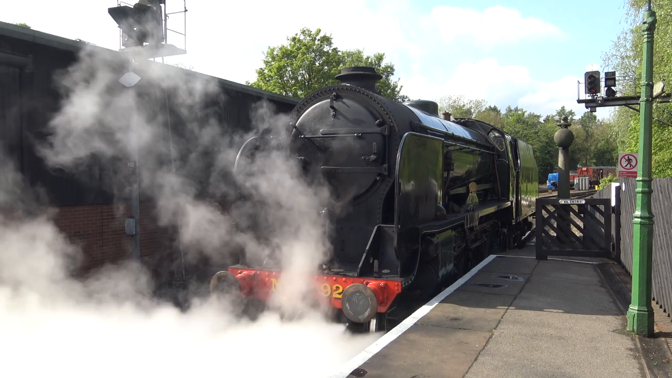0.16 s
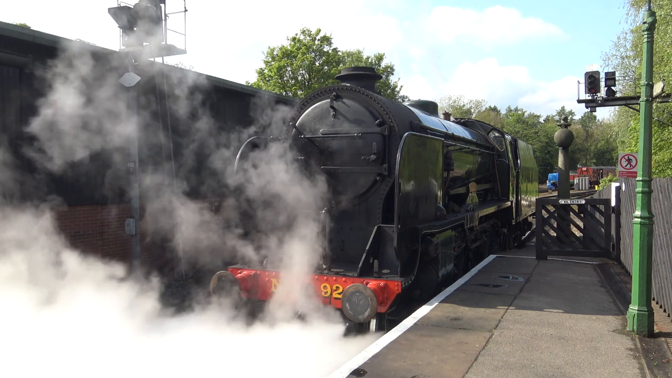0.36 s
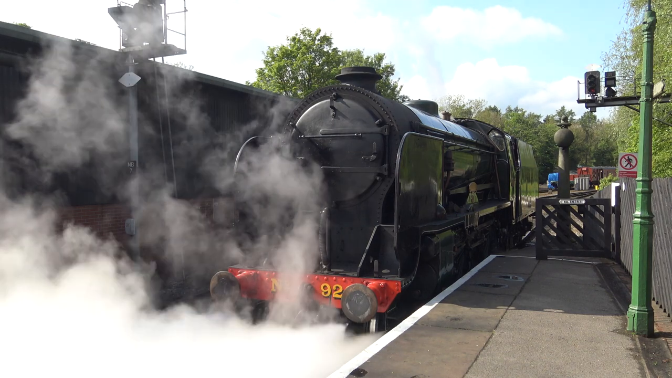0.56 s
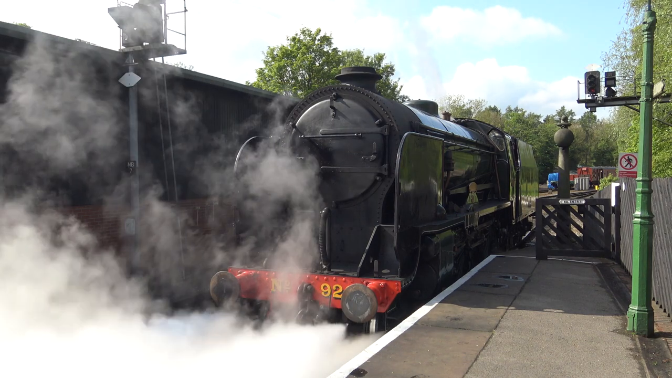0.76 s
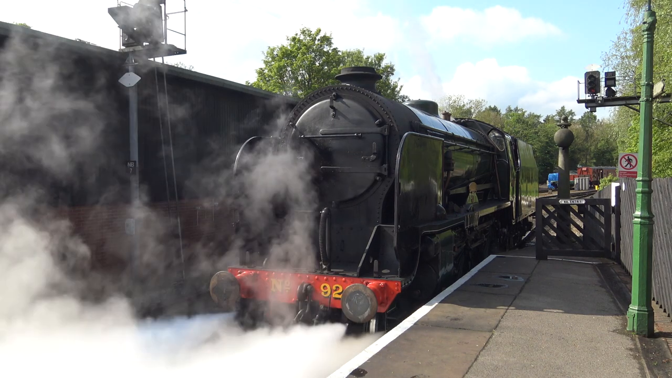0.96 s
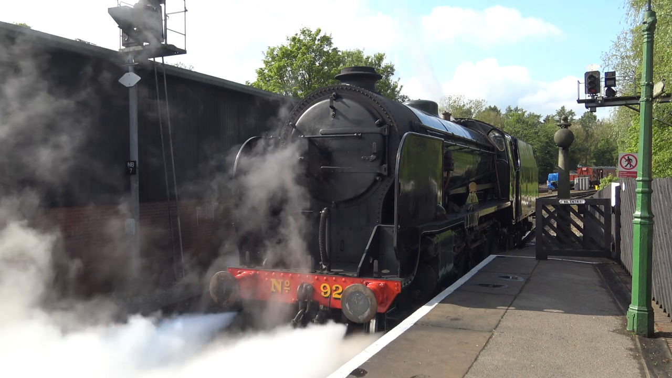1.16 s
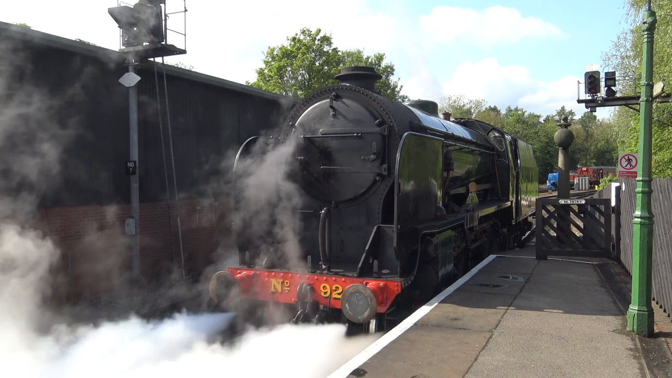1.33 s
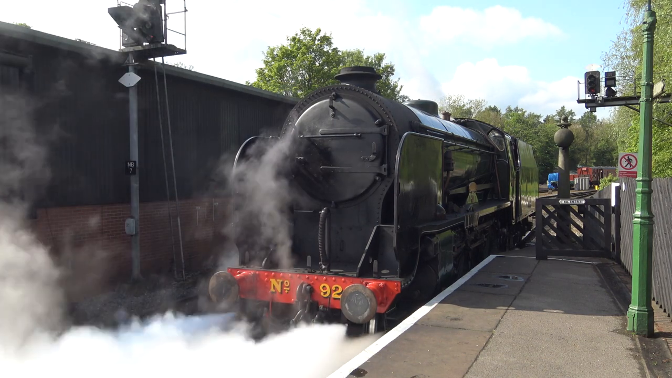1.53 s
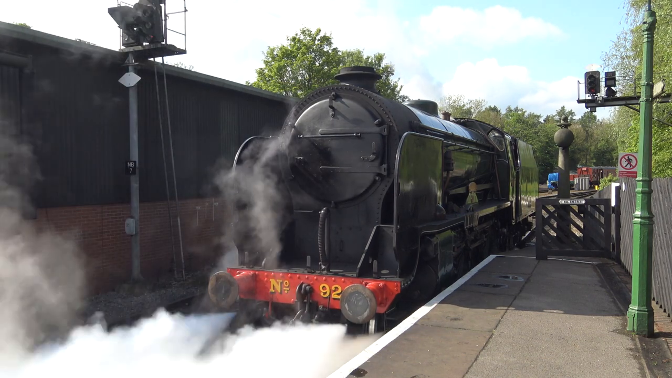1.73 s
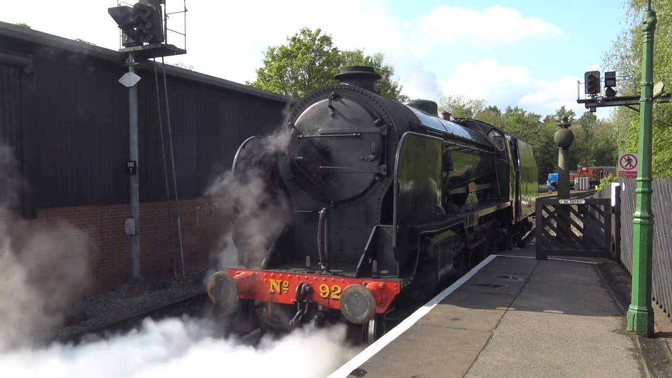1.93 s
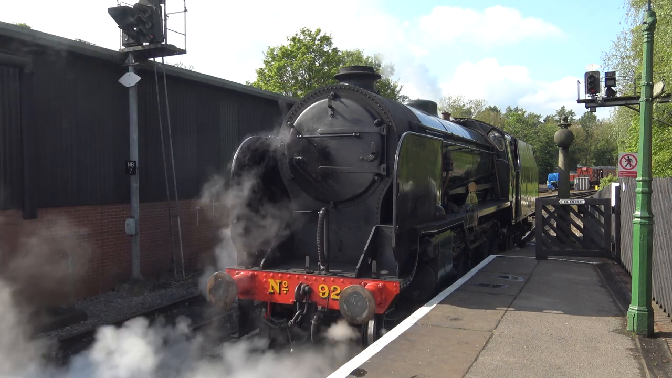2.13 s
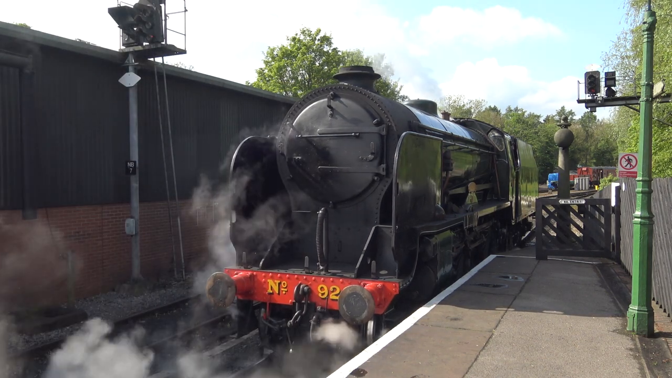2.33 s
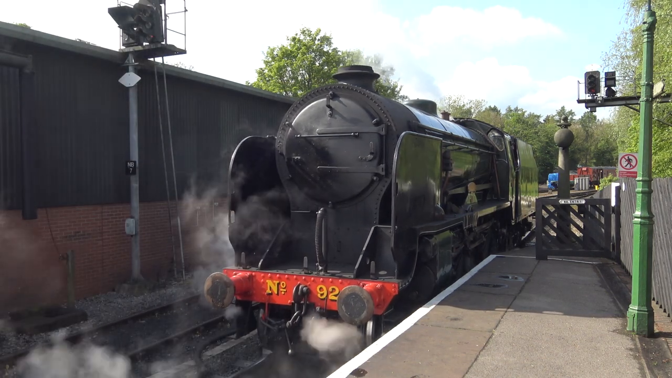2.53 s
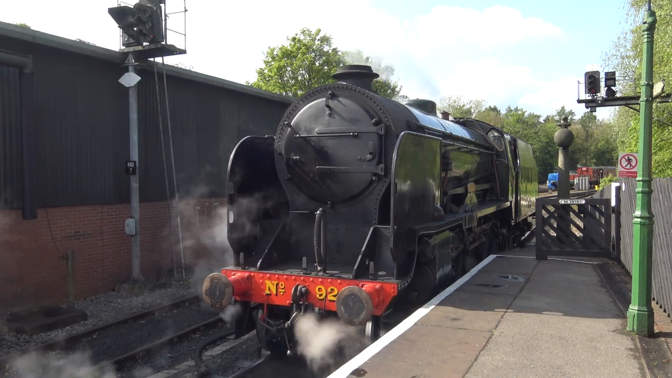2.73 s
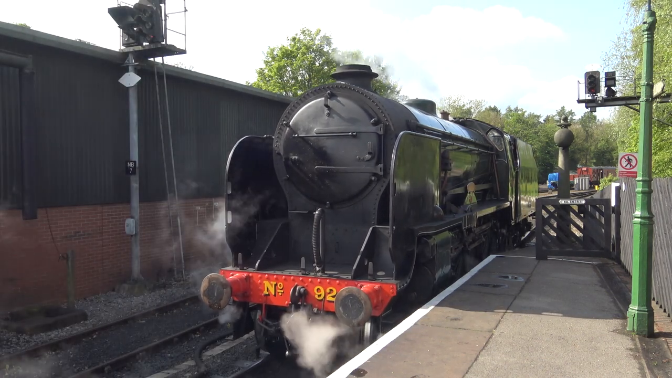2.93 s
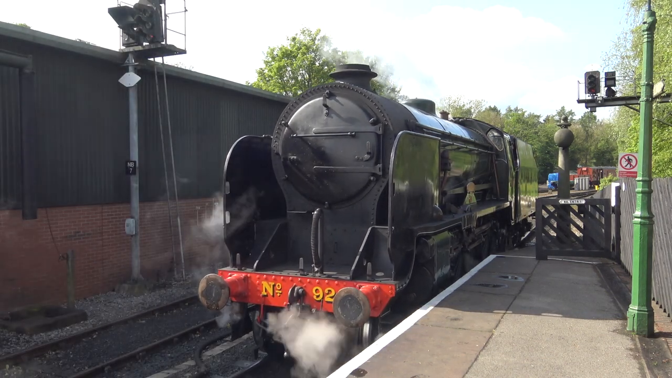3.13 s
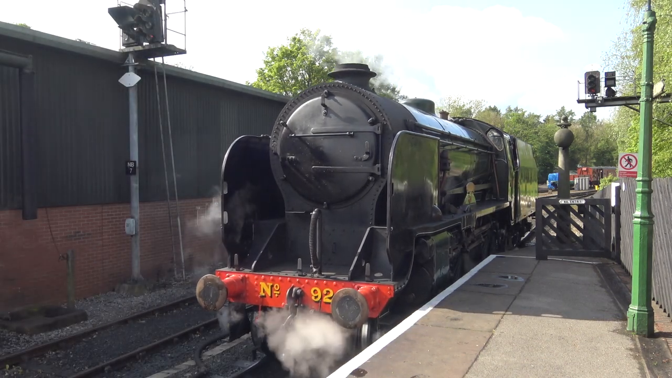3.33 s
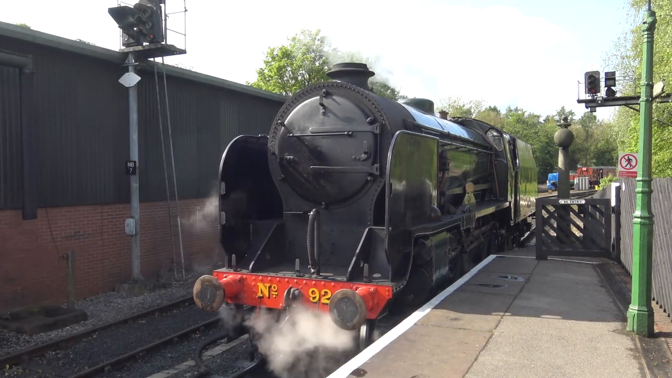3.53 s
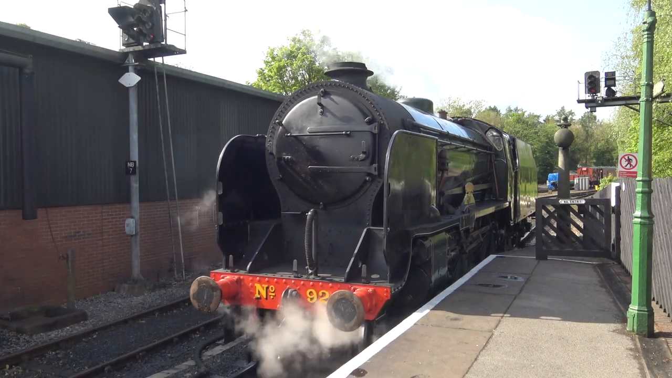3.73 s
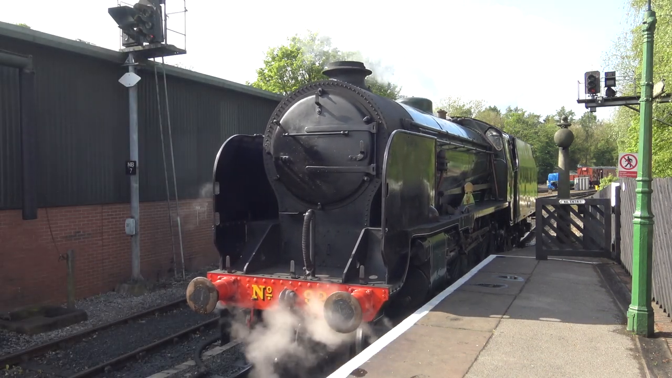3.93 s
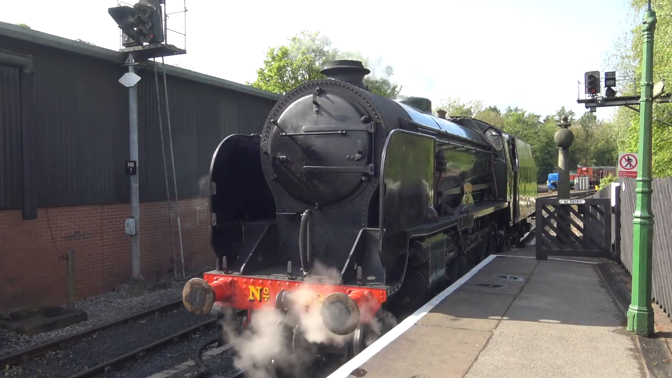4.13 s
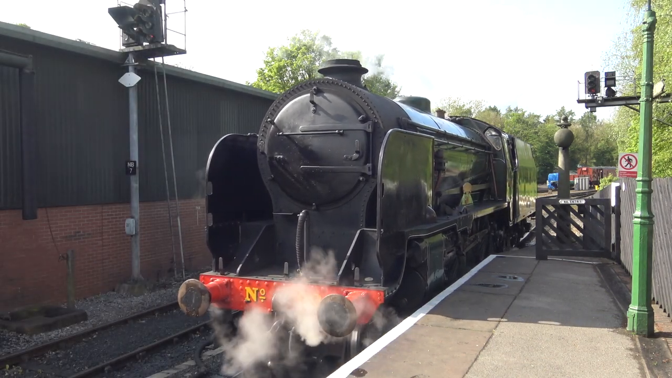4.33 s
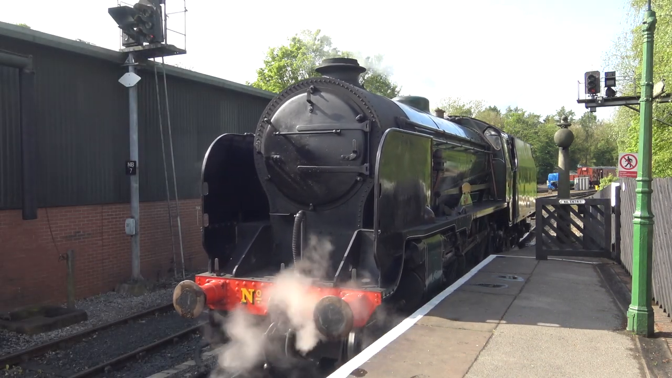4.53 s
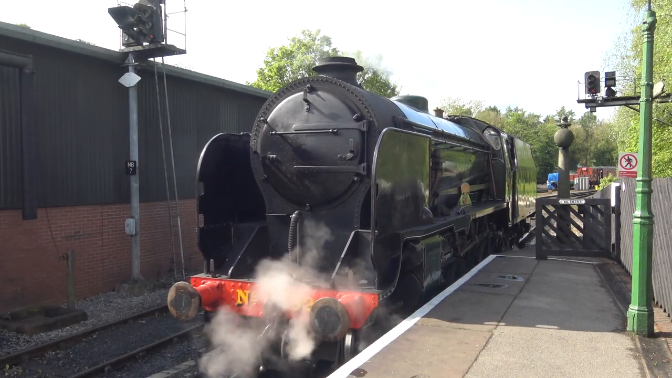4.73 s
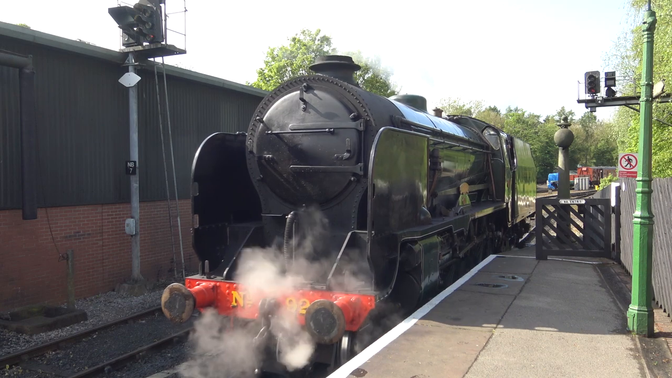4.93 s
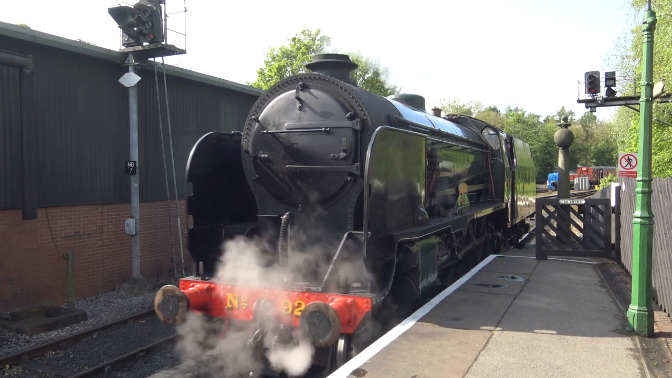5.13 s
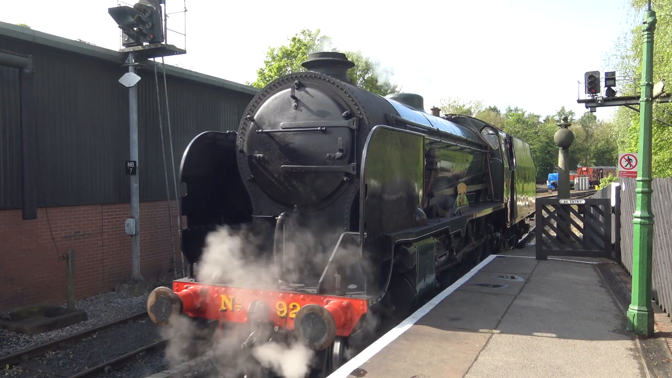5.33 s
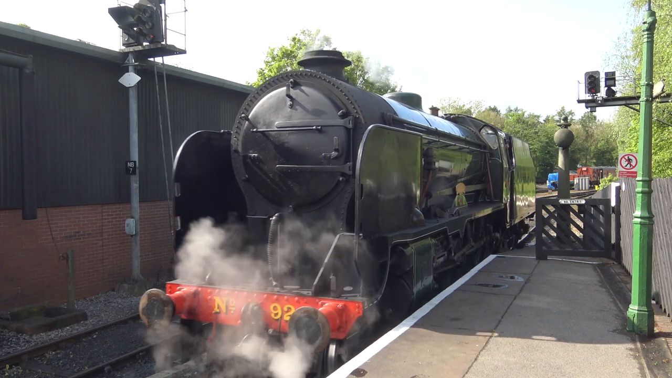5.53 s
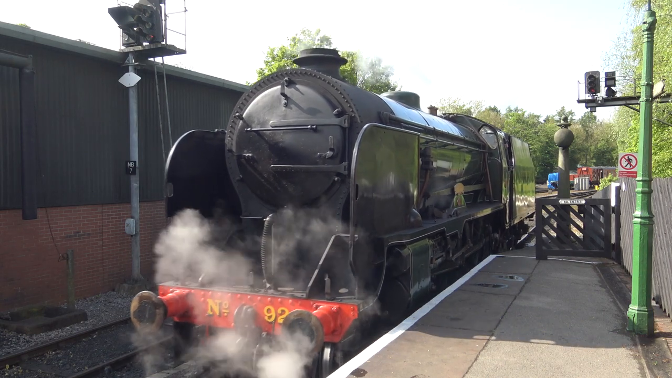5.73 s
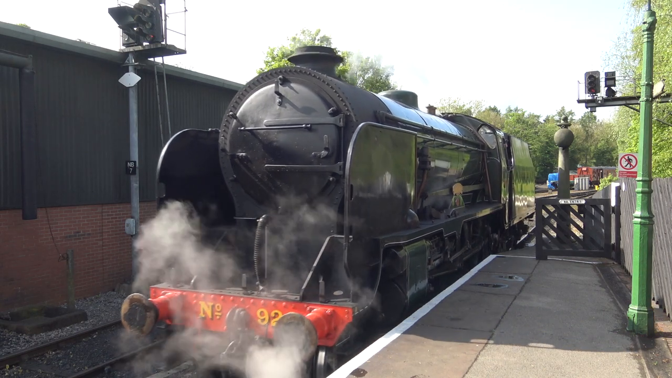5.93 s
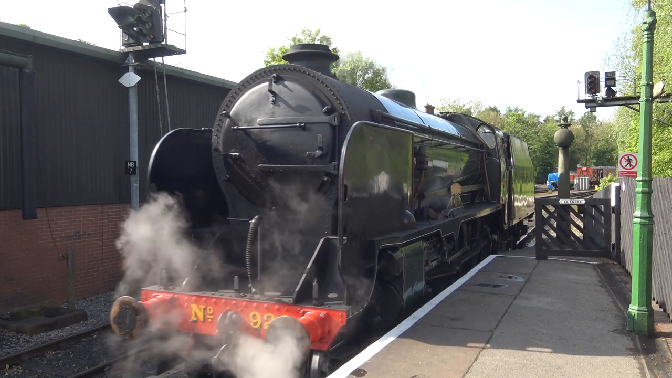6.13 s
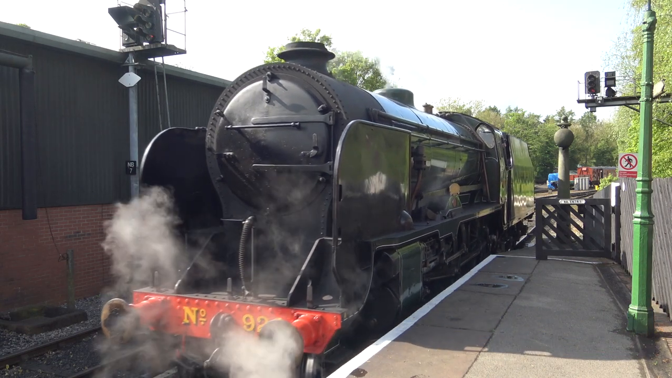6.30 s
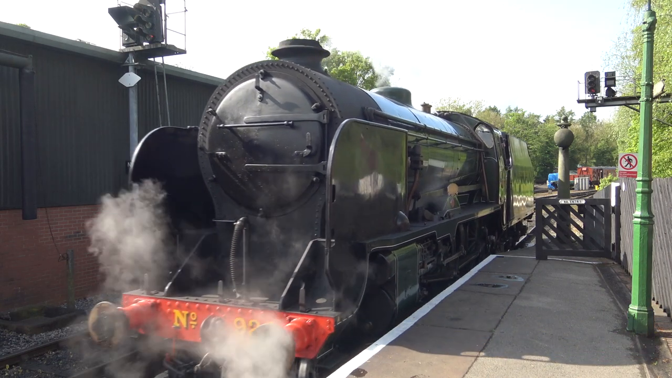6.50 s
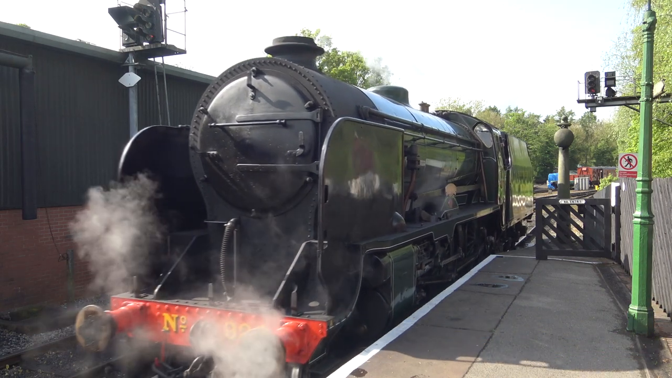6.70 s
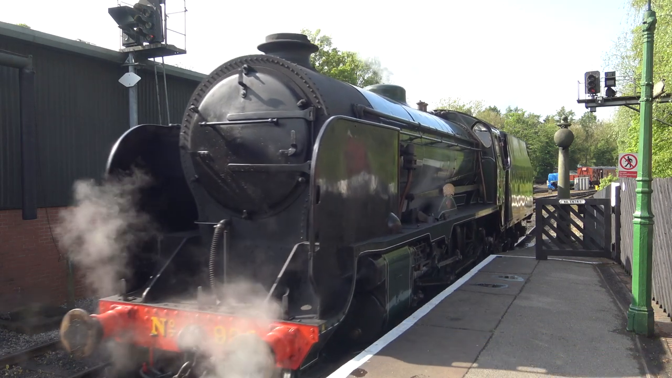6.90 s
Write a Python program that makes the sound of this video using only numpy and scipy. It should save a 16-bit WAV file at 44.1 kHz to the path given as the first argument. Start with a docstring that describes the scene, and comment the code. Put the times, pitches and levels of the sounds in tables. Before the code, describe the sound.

From the first instant a steam locomotive's open jets give a dense, bright, roaring hiss, so loud that the microphone distorts. At about 0.4 seconds a lump of air strikes it, and deep, ragged buffeting continues and builds beneath the hiss. Just before 2 seconds everything shuts off in a moment, with dull clunks. A far quieter leak remains: thin, flickering hiss and a hollow, slightly swelling ring over muffled boiler roar, with soft thuds near 3.3 and 3.9 seconds. From about 4.3 seconds the steam sinks away, leaving a subdued lull with faint flue tones and a knock near 5.1. Hiss rises quickly again towards 5.9, when a broader, closer rush opens, with one soft, hollow chuff around 6 and low thuds near 6.2 and 6.8. The rush grows until 6.8, then drops, as faint wheel rumble increases. Outdoors, centred, with short dull echoes from platform and wall.

```python
"""Steam jets from open drain cocks blast out as a locomotive creeps away from a platform.
The jets are coloured noise that overloads the microphone until the cocks shut after about two seconds,
and their air soon adds a low buffeting. Leaking steam, as flickering hiss and hollow resonances,
goes on over the boiler's roar and flue tones, dull knocks and the growing rumble of the wheels.
The chimney gives one soft chuff, and the near cylinder blows a broad rush as the engine draws closer."""
import sys
import numpy as np
from scipy import signal
from scipy.fft import rfft, irfft, next_fast_len
from scipy.io import wavfile
from scipy.ndimage import uniform_filter1d

SR = 44100
rng = np.random.default_rng(int(sys.argv[2]) if len(sys.argv) > 2 else 0)


def inscribe(sig):
    """Save sig as 16-bit PCM at rate SR to the path in sys.argv[1].

    A 1-D sig is mono; a 2-D sig holds one channel per row.
    Samples are clipped to [-1, 1] before scaling.
    """
    pcm = np.round(np.clip(np.atleast_2d(sig).T, -1, 1) * 32767)
    wavfile.write(sys.argv[1], SR, pcm.astype(np.int16))


N = 311346
TIME = np.arange(N) / SR  # s
FREQ = np.maximum(np.fft.rfftfreq(next_fast_len(N, True), 1 / SR), 1)  # Hz

# roar of boiler and fire: (frequency [Hz], relative density [dB per Hz])
ROAR_SPECTRUM = [(25, -21), (60, -13.5), (120, -11), (190, -7), (250, -4), (450, -2.5), (620, -1.5),
                 (850, -1), (1100, 0.5)]
# draught singing in the flue, the times at half fade:
# (frequency [Hz], width [Hz], level [dB], start [s], end [s])
FLUE_TONES = [(43, 5, -66.5, 4.6, 7.5), (239, 18, -60, 3.87, 7.5), (332, 22, -61, 4.6, 7.5),
              (620, 12, -57, 2.78, 5.6)]
# rumble of wheels on the rails: (frequency [Hz], width [Hz], relative level [dB])
TRACK_RESONANCES = [(68, 30, -5), (107, 30, 0)]
# dull knocks of the cock linkage and running gear:
# (time [s], frequency [Hz], width [Hz], level [dB], decay [s])
KNOCK_EVENTS = [(1.97, 85, 35, -51, .06), (2.08, 340, 130, -48.5, 0.072), (3.33, 75, 30, -58, .06),
                (3.87, 85, 40, -58, .06), (5.09, 75, 45, -57, .09), (6.16, 105, 40, -54, .09),
                (6.77, 90, 45, -55, .09)]
# the exhaust beat: (time of peak [s], half length to 1/e [s], level [dB])
CHUFF_BEAT = (6.05, 0.12, -42.5)
# resonances of the chimney: (frequency [Hz], width [Hz], relative level [dB])
CHIMNEY_RESONANCES = [(226, 20, -2), (370, 34, 0), (520, 30, -7), (598, 44, -8), (780, 34, -10)]
# hiss of leaking steam: (frequency [Hz], relative density [dB per Hz])
HISS_SPECTRUM = [(1410, -5), (2400, -11.5), (2770, -5), (3430, -5.5), (3710, -4), (4320, -6), (5610, -3.5),
                 (6950, -5.5), (8610, -3.5), (10800, -13), (13800, -12), (15100, -15.5), (16000, -24)]
# resonances of the space between the frames: (frequency [Hz], width [Hz], relative level [dB])
FRAME_RESONANCES = [(1152, 71, 0), (1317, 97, 1.5), (1560, 210, -6), (1860, 145, -2), (2047, 150, -1),
                    (2320, 280, -4.5), (2735, 340, -5.5), (3760, 120, -12)]
# steam filling the space between the frames, once a stroke:
# (full [s], empties [s], level when full [dB])
HOLLOW_STROKES = [(2.0, 4.45, -41), (5.4, 5.87, -41.5)]
# rush of the near cylinder: (frequency [Hz], relative density [dB per Hz])
RUSH_SPECTRUM = [(150, -19), (500, -18), (780, -10.5), (980, -2.5), (1160, 3.5), (1270, 1.5), (1400, 1),
                 (1700, -0.5), (2100, 0), (3100, 0), (4200, -3), (5600, -7.5), (7500, -15.5), (16000, -45)]
# eddies in the air thrown at the microphone: (frequency [Hz], relative density [dB per Hz])
EDDY_SPECTRUM = [(15, 6), (50, -0.5), (130, -2), (300, -6), (600, -8), (1200, -15.5), (3000, -12.5)]
# noise of the open jets: (frequency [Hz], relative density [dB per Hz])
JET_SPECTRUM = [(40, -21), (300, -21.5), (850, -12.5), (1300, -4), (1750, -3), (2300, 0), (3500, 1),
                (5200, 2), (7000, 1.5), (8600, 3), (9500, -3.5), (10700, -10), (13000, -7), (16000, -15)]
# echoes off the platform edge, the engine and the shed wall:
# (lag at the start [s], drift as the engine moves [s per s])
ECHO_PATHS = [(.0163, .00015), (.0217, -.0002), (.0289, .0003), (.0371, -.0003), (.0473, -.0004)]

# the fire at rest, the draught that the strokes add, and the fade of the flue tones
FIRE_DB, DRAUGHT_DB, FLUE_FADE_S = -51, -49, 0.33
# the wheels' rumble: its level at a given moment, and its growth
ROLLING_DB, ROLLING_AT_S, ROLLING_GROWTH_DB_PER_S = -59.5, 7.2, 6
# the leak holds until its cylinder's pressure starts to sink
LEAK_DB, LEAK_SINKS_S, LEAK_FALL_DB_PER_S = -36.5, 4.25, 7.5
# the hollow ring between the frames; its share in the blast is relative to the open jets
HOLLOW_RISE_DB_PER_S, HOLLOW_GROWTH_DB_PER_S, HOLLOW_FALL_DB_PER_S = 23, 1.38, 15.5
HOLLOW_IN_BLAST_DB = -20
# the near cylinder fills, grows louder as it approaches, then empties
NEAR_FULL_S, NEAR_EMPTIES_S = 5.87, 6.82
NEAR_RISE_DB_PER_S, NEAR_GROWTH_DB_PER_S, NEAR_FALL_DB_PER_S = 27, 3.5, 10.5
NEAR_RUSH_DB, NEAR_HISS_DB = -32.5, -40.5
# the jets' air reaches the microphone, builds, and drops away as the cocks close
GUST_ARRIVES_S, GUST_ENDS_S, GUST_SURGE_DB = .43, 1.899, 0.8
GUST_DB, GUST_GROWTH_DB_PER_S, GUST_EDGE_DB_PER_S, BREEZE_DB = -14.5, 3, 600, -40
FRONT_DB, FRONT_FALL_DB_PER_S = -12.5, 37  # the first lump of air hits hardest
# the drain cocks blow evenly, then close in one quick turn; a ring, relative to the blast, outlasts them
BLAST_DB, SHUT_S, CLOSING_S = -3.5, 1.957, 0.065
RING_DB, RING_FALL_DB_PER_S = -27, 140
# the jets' bounce off the track bed
GROUND_LAG_S, GROUND_SHARE = .002645, .19
# the echoes' gain, and where their treble is 6 dB down
ECHO_SHARE, ECHO_DULL_HZ = .215, 7500
# the microphone's limit, and the band that is passed on
CEILING_DB, BASS_HZ, TOP_HZ = -11, 28, 15850


def undb(db):
    """Decibels to gain."""
    return 10 ** (np.asarray(db) / 20)


def unit(x):
    """Scale to a standard deviation of 1."""
    return x / np.std(x)


def colour(points):
    """Gain over frequency from (Hz, dB) points, falling 12 dB an octave outside them."""
    hz, db = np.transpose(points)
    outside = np.minimum(FREQ / hz[0], 1) * np.minimum(hz[-1] / FREQ, 1)
    inside = undb(np.interp(np.log(FREQ), np.log(hz), db))
    return inside * outside ** 2


def resonances(modes):
    """Gain over frequency of steep (Hz, width, dB) resonances, summed in power."""
    power = 0
    for hz, width, db in modes:
        detune = (FREQ / hz - hz / FREQ) * hz / width / 2  # near the peak: offset in widths
        power = power + (undb(db) / (1 + 2 * detune ** 2)) ** 2
    return np.sqrt(power)


def shape(x, gain):
    """Filter by a gain over frequency."""
    size = next_fast_len(N, True)
    return irfft(rfft(x, size) * gain, size)[:N]


def noise(gain):
    """Noise of rms 1 with the given colour."""
    return unit(shape(rng.standard_normal(N), gain))


def walk(rate):
    """Random levels held 1 / rate s and smoothed twice; spread 1."""
    hold = max(int(SR / rate), 2)  # samples
    held = np.repeat(rng.standard_normal(1024), hold)[:N]
    return unit(uniform_filter1d(uniform_filter1d(held, hold), hold))


def turbulence(gain, surge_db, flicker_db):
    """Flow noise: the whole stream surges while four overlapping bands of eddies flicker on their own."""
    centres = np.log([400, 1200, 3500, 10000])  # of the bands, Hz
    stream = 0
    for share in np.eye(len(centres)):
        crossfade = np.sqrt(np.interp(np.log(FREQ), centres, share))
        band = shape(rng.standard_normal(N), gain * crossfade)
        stream = stream + band * undb(flicker_db * walk(32))
    return unit(stream) * undb(surge_db * walk(20))


def swell(full, ends, rise, growth, fall):
    """Gain that rises to 1 at `full` s, grows slowly until `ends` s, then falls; slopes in dB per s."""
    held = np.clip(TIME, full, ends) - full
    before = np.maximum(full - TIME, 0)
    after = np.maximum(TIME - ends, 0)
    return undb(growth * held - rise * before - fall * after)


def leak_flow():
    """Pressure behind the leak: steady, then sinking."""
    return swell(0, LEAK_SINKS_S, 0, 0, LEAK_FALL_DB_PER_S)


def near_flow():
    """One stroke of the cylinder on the platform side."""
    return swell(NEAR_FULL_S, NEAR_EMPTIES_S, NEAR_RISE_DB_PER_S, NEAR_GROWTH_DB_PER_S, NEAR_FALL_DB_PER_S)


def jet_flow():
    """Steam through the cocks follows their opening; a short ring outlasts it."""
    opening = np.clip((SHUT_S - TIME) / CLOSING_S, 0, 1)
    ring = undb(RING_DB) * swell(0, SHUT_S, 0, 0, RING_FALL_DB_PER_S)
    return undb(BLAST_DB) * np.hypot(opening, ring)


def boiler():
    """The fire's dull roar follows the draught; narrow flue tones fade in and out over it."""
    draught = undb(DRAUGHT_DB) * np.hypot(leak_flow(), near_flow())
    out = noise(colour(ROAR_SPECTRUM)) * np.hypot(undb(FIRE_DB), draught)
    for hz, width, db, start, end in FLUE_TONES:
        fade = np.clip(np.minimum(TIME - start, end - TIME) / FLUE_FADE_S + .5, 0, 1)
        tone = noise(resonances([(hz, width, 0)]))
        out = out + tone * undb(db) * fade
    return out


def wheels():
    """Track resonances give a low rumble that grows as the engine gathers speed."""
    level_db = ROLLING_DB + ROLLING_GROWTH_DB_PER_S * (TIME - ROLLING_AT_S)
    return noise(resonances(TRACK_RESONANCES)) * undb(level_db)


def knocks():
    """Heavy parts take up their slack with short, dull thuds."""
    out = 0
    for at, hz, width, db, decay in KNOCK_EVENTS:
        age = np.maximum(TIME - at, 0)
        envelope = np.minimum(age / .008, 1) * np.exp(-age / decay)  # 8 ms attack
        thud = noise(resonances([(hz, width, 0)]))
        out = out + thud * undb(db) * envelope
    return out


def chuff():
    """One slow, soft exhaust beat sounds the chimney."""
    at, half, db = CHUFF_BEAT
    puff = np.exp(-((TIME - at) / half) ** 2)
    return noise(resonances(CHIMNEY_RESONANCES)) * undb(db) * puff


def leak():
    """Leaking steam makes a thin hiss, with a hollow ring from the space between the frames."""
    flow = np.hypot(undb(LEAK_DB) * leak_flow(), undb(NEAR_HISS_DB) * near_flow())
    hiss = turbulence(colour(HISS_SPECTRUM), surge_db=0.47, flicker_db=0.2) * flow
    hollow = undb(HOLLOW_IN_BLAST_DB) * jet_flow()
    for full, empties, db in HOLLOW_STROKES:
        stroke = swell(full, empties, HOLLOW_RISE_DB_PER_S, HOLLOW_GROWTH_DB_PER_S, HOLLOW_FALL_DB_PER_S)
        hollow = np.hypot(hollow, undb(db) * stroke)
    ring = turbulence(resonances(FRAME_RESONANCES), surge_db=0.7, flicker_db=.5) * hollow
    return hiss + ring


def near_cylinder():
    """A broader, lower rush as steam is admitted on the platform side."""
    rush = turbulence(colour(RUSH_SPECTRUM), surge_db=0.45, flicker_db=0.7)
    return rush * undb(NEAR_RUSH_DB) * near_flow()


def buffeting():
    """Lumps of air pushed along by the jets hit the microphone in quick succession."""
    flutter = undb(1.6 * walk(70))
    surge = undb(GUST_SURGE_DB * walk(12))
    body = undb(GUST_DB) * swell(GUST_ARRIVES_S, GUST_ENDS_S, GUST_EDGE_DB_PER_S,
                                 GUST_GROWTH_DB_PER_S, GUST_EDGE_DB_PER_S)
    front = undb(FRONT_DB) * swell(GUST_ARRIVES_S, GUST_ARRIVES_S, GUST_EDGE_DB_PER_S,
                                   0, FRONT_FALL_DB_PER_S)
    gust = np.hypot(body, front) * surge
    breeze = undb(BREEZE_DB) * swell(0, GUST_ENDS_S, 0, 0, RING_FALL_DB_PER_S)
    return noise(colour(EDDY_SPECTRUM)) * flutter * np.hypot(gust, breeze)


def drain_cocks():
    """Choked, steady jets; their bounce off the track bed combs the hiss."""
    bounce = 1 + GROUND_SHARE * np.exp(-2j * np.pi * FREQ * GROUND_LAG_S)
    jets = turbulence(colour(JET_SPECTRUM) * bounce, surge_db=1.0, flicker_db=1.5)
    return jets * jet_flow()


def surroundings(x):
    """Add dull echoes whose paths slide as the engine moves, so that fine bands drift through the hiss."""
    dull = shape(x, 1 / (1 + (FREQ / ECHO_DULL_HZ) ** 2))
    echoes = 0
    for lag, drift in ECHO_PATHS:
        echoes = echoes + np.interp(TIME - lag - drift * TIME, TIME, dull, left=0)
    return x + ECHO_SHARE * echoes


def scene():
    """All sources lie ahead, the same in both channels; only the steam has echoes."""
    steam = surroundings(leak() + near_cylinder() + drain_cocks())
    air = boiler() + wheels() + knocks() + chuff() + buffeting() + steam
    return np.array([air, air])


def record(dry):
    """The microphone saturates in the blast; then the deep bass is trimmed and the top cut."""
    ceiling = undb(CEILING_DB)
    fine = signal.resample_poly(dry, 3, 1, axis=1)  # oversampled to curb aliasing from the saturation
    saturated = ceiling * np.tanh(fine / ceiling)
    squashed = signal.resample_poly(saturated, 1, 3, axis=1)
    high_pass = signal.butter(1, BASS_HZ, "high", fs=SR, output="sos")
    trimmed = signal.sosfilt(high_pass, squashed)
    low_pass = signal.firwin(401, TOP_HZ, fs=SR, window="blackman")
    return signal.fftconvolve(trimmed, low_pass[None], "same", axes=1)


dry = scene()
out = record(dry)
inscribe(out)
```